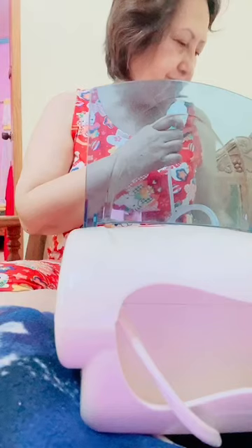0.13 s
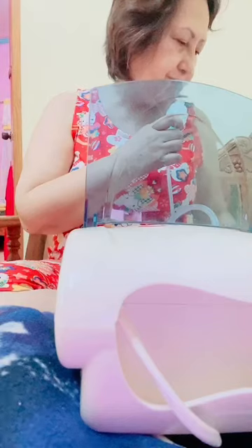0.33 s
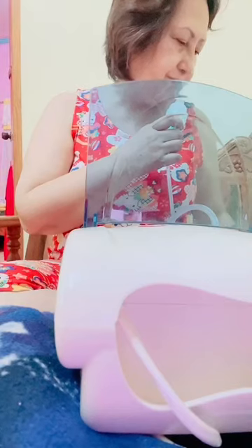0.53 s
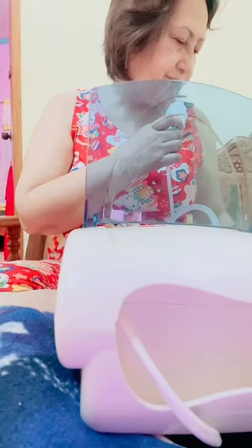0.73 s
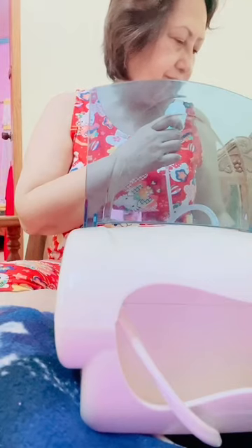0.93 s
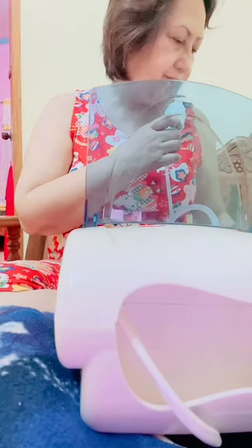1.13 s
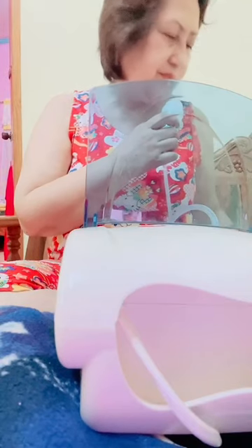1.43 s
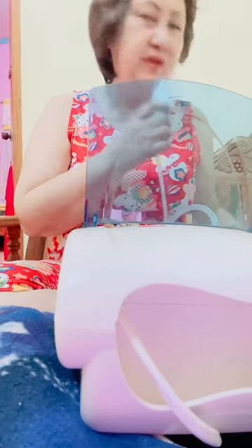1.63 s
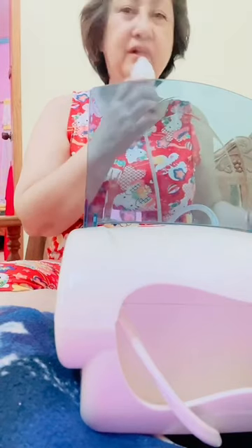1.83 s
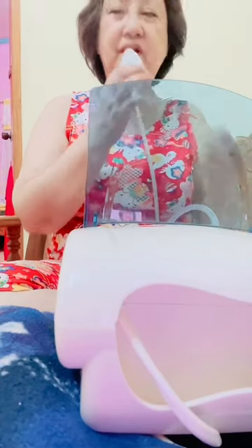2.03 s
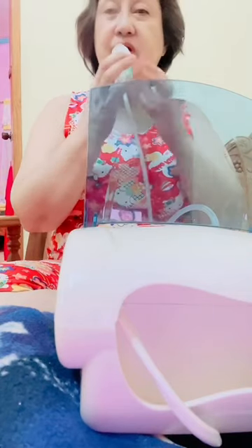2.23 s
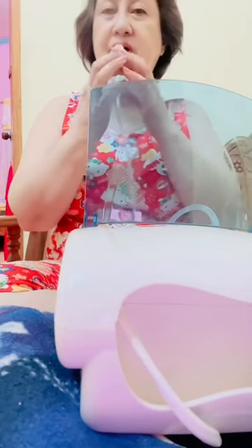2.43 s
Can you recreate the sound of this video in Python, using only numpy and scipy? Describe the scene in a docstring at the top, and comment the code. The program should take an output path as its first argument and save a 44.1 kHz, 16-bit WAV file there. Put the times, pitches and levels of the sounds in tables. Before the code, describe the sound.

A nebulizer compressor is already running close to the microphone in a bedroom, humming and buzzing with a throbbing plastic rattle. Its valve ticks rapidly, now and then snapping harder. Air hisses at the mouthpiece and droplets fizz finely in the cup. At about 1.5 seconds the fizz dies away, while the buzz and a slightly wavering hiss continue to the end at about 2.6 seconds.

```python
"""A bedroom, one microphone close to a nebulizer whose small piston compressor is already running.
The mains-driven motor hums; each shaft turn knocks the plastic housing several times and ticks a valve.
The knocks swell wherever they fall in step with the mains vibration, so the buzz throbs. Air hisses at
the mouthpiece, droplets fizz in the cup, and now and then the valve snaps harder.
About 1.5 s in, the cup is lifted and its fizz dies away; the machine and the hiss carry on."""
import sys
import numpy as np
from scipy import signal
from scipy.fft import rfft, irfft
from scipy.io import wavfile
from scipy.ndimage import uniform_filter1d

SR = 44100
rng = np.random.default_rng(int(sys.argv[2]) if len(sys.argv) > 2 else 0)


def store_pcm(level_fs):
    """Save levels as 16-bit WAV."""
    pcm = np.round(np.clip(level_fs, -1, 1) * 32767).astype(np.int16)
    wavfile.write(sys.argv[1], SR, np.atleast_2d(pcm).T)


N = 114219

SHAFT_HZ, HUM_HZ = 53.06, 119.93
JITTER_S, MAINS_PULL_S = .00012, .0007  # timing of knocks and ticks

# Shaft tones. Each entry: level in dB at 1, 2, 3, .. times the shaft rate.
SHAFT_TONES_DB = [-46.5, -38, -52, -41, -45.5, -50, -54.5, -48, -42, -44.5, -43]
# Mains hum and sidebands. Each entry: level in dB at the hum plus 0, 1, 2 shaft rates.
HUM_TONES_DB = [-31, -47, -41]
# Other steady tones. Each row: frequency in Hz, level in dB.
DRONE_TONES = [(48.7, -58), (72.9, -46), (292.9, -42.5)]

# Housing knocks and valve ticks within one turn.
# Each row: shaft angle in turns, relative level in dB, hum phase of the hardest hit in cycles.
TURN_KNOCKS = [(.03, -6.5, 0.396), (.2, -5, .2), (.31, -3.5, 0.614), (.4, -4.5, 0.84), (.58, 0.5, 0.096),
               (.7, -9.5, 0.538), (.92, -4.5, 0.844)]
TURN_TICKS = [(.5, 0, .8), (.84, 11, 0.93), (.99, -6, 0.058)]
# Hard valve snaps. Each row: start in seconds, relative level in dB.
HARD_SNAPS = [(0.164, -14), (0.2977, -26), (0.3736, -15), (0.5063, -14.5), (0.5995, -15), (0.7306, -13),
              (1.0908, -17.5), (1.3896, -19), (1.505, -19.5), (1.5992, -15), (1.7494, -14.5), (2.032, -20),
              (2.257, -16), (2.398, -17), (2.473, -17.5)]
# Loudness of the mouthpiece hiss and the cup's fizz. Each row: time in seconds, level in dB.
HISS_LEVELS = [(.04, -25), (.26, -26.5), (.33, -24), (.42, -26.5), (.8, -26.5), (1.15, -26.5),
               (1.39, -26.5), (1.48, -29.5), (1.67, -33), (1.72, -24.5), (1.77, -26.5), (1.81, -28.5),
               (2.06, -30), (2.1, -25.5), (2.15, -24), (2.22, -30.5), (2.58, -31)]
FIZZ_LEVELS = [(.04, -26), (.26, -24.5), (.36, -32), (.65, -29.5), (1.0, -25), (1.38, -26.5), (1.46, -27),
               (1.6, -40), (2.58, -60)]

# Colour of each sound at the microphone. Each row: frequency in Hz, relative gain in dB.
THUD_COLOUR = [(90, -24.5), (150, -3.5), (270, -1), (340, -7), (550, -0.5), (720, -8), (820, 1),
               (1000, -1.5), (1550, -7.5), (1820, -3.5), (2200, -6), (2650, -6), (3000, -35), (6500, -40)]
RATTLE_COLOUR = [(90, -31.5), (200, -9.5), (340, -6), (520, -3), (720, -3.5), (780, -2), (900, -0.5),
                 (970, -5.5), (1120, 0), (1350, -3.5), (1590, -7.5), (1780, -1.5), (2000, -4), (2380, -11),
                 (2660, -3.5), (2880, -15.5), (3450, -13), (3900, -17), (4200, -9), (4700, -35.5),
                 (6500, -59), (10000, -64)]
TICK_COLOUR = [(2240, -35), (3800, 14.5), (4380, -4.5), (4850, 13), (5490, 20.5), (5800, -32), (6400, 10.5),
               (7300, -10), (8120, -13), (9540, -9.5), (10700, -26), (13200, -12), (14300, -14),
               (15700, -7)]
AIR_COLOUR = [(2500, -37), (4100, -12), (4600, 1.5), (5000, 5.5), (5600, 3), (6300, -1.5), (6700, -12.5),
              (7100, -15.5), (7800, -50), (9000, -22), (9600, -15.5), (10500, -56), (13400, -13),
              (14250, -24), (15700, -30)]
SIZZLE_COLOUR = [(8000, -47), (12000, -6), (13600, -21), (14250, 10), (14900, -5), (15700, -13)]
HARD_SNAP_COLOUR = [(2500, -22), (4200, -15), (4750, 1), (5550, 3), (5950, -9), (6600, -17), (7600, -35),
                    (9500, -26), (11000, -45), (14200, -30), (15700, -45)]
ROOM_COLOUR = [(25, -16), (40, -5), (63, 4), (85, -3), (200, 1.5), (600, -8.5), (3000, -35)]

# Resonances of the case, the valve and the upright cup.
# Each row: frequency in Hz, width in Hz, relative gain in dB.
CASE_RESONANCES = [(822, 55, 0), (1815, 45, -1.5), (2650, 70, -12), (3680, 70, -8.5)]
VALVE_RESONANCES = [(4900, 54, -2), (5470, 47, 0)]
CUP_RESONANCES = [(4678, 78, 8), (4660, 160, -5), (4970, 130, -5), (5240, 120, -7)]


def undb(db):
    return 10 ** (np.asarray(db) / 20)


def level(x, db):
    """Scales x to an RMS level in dB, steady or a curve."""
    return x * undb(db) / np.sqrt(np.mean(x ** 2))


def noise():
    return rng.standard_normal(N)


def colour(x, points, size=4096):
    """Causal filter through (Hz, dB) points: its peaks ring after a blow."""
    hz, db = np.array(points).T
    bins_hz = np.maximum(np.fft.rfftfreq(size, 1 / SR), 1)
    gain = undb(np.interp(np.log(bins_hz), np.log(hz), db))
    cepstrum = irfft(np.log(gain))
    cepstrum[1:size // 2] *= 2  # fold to minimum phase
    cepstrum[size // 2 + 1:] = 0
    response = irfft(np.exp(rfft(cepstrum)))
    return signal.fftconvolve(x, response)[:N]


def ring(x, modes):
    """Sum of narrow resonances driven by x."""
    return sum(undb(db) * signal.lfilter(*signal.iirpeak(hz, hz / width, fs=SR), x)
               for hz, width, db in modes)


def pulses(times, sizes):
    """One impulse at each time."""
    at = np.round(times * SR).astype(int)
    inside = (at >= 0) & (at < N)
    return np.bincount(at[inside], sizes[inside], N)


def fade(x, decay_s):
    """Gives each impulse an exponential tail; run again with a shorter decay, it softens the rise."""
    return signal.lfilter([1], [1, -np.exp(-1 / (decay_s * SR))], x)


def blows(table, swing_db, scatter_db):
    """Blows at set shaft angles, pulled early or late by the mains vibration, harder when in step."""
    turns = np.arange(int(N / SR * SHAFT_HZ) + 1)
    hits = np.zeros(N)
    for angle, db, hardest_phase in table:
        lateness, strength = rng.standard_normal((len(turns), 2)).T
        times = (turns + angle) / SHAFT_HZ
        hum_phase = 2 * np.pi * (HUM_HZ * times - hardest_phase)
        times = times + JITTER_S * lateness - MAINS_PULL_S * np.sin(hum_phase)
        hits += pulses(times, undb(db + swing_db * np.cos(hum_phase) + scatter_db * strength))
    return hits


def motor(t):
    """The motor's clean tones: shaft multiples and the mains hum with its sidebands, plus a few other steady
    tones, the two lowest from a fan nearby."""
    tones = [((k + 1) * SHAFT_HZ, db) for k, db in enumerate(SHAFT_TONES_DB)]
    tones += [(HUM_HZ + k * SHAFT_HZ, db) for k, db in enumerate(HUM_TONES_DB)]
    return sum(np.sqrt(2) * undb(db) * np.sin(2 * np.pi * (hz * t + rng.random()))
               for hz, db in tones + DRONE_TONES)


def housing_knocks():
    """Each knock thuds on the plastic case and swells into a brief rattle; both set the case ringing."""
    hits = blows(TURN_KNOCKS, swing_db=2.5, scatter_db=.5)
    thud = level(colour(-hits, THUD_COLOUR), db=-30)
    tails = fade(hits, decay_s=.0024)
    rattle = fade(tails, .001) * noise()
    ringing = ring(level(hits, db=0) + level(rattle, db=0), CASE_RESONANCES)
    return thud + level(colour(rattle, RATTLE_COLOUR), db=-24.5) + level(ringing, db=-32)


def valve_ticks():
    """The valve ticks brightly on every turn and rings for a moment."""
    hits = blows(TURN_TICKS, swing_db=10, scatter_db=1.5)
    envelope = fade(hits, decay_s=.0033)
    ringing = ring(envelope * noise(), VALVE_RESONANCES)
    ticks = colour(envelope * noise(), TICK_COLOUR)
    return level(ticks, db=-34.5) + level(ringing, db=-38.5)


def air_hiss(t, sputter_hz=230, sputter_db=.5):
    """Air hisses at the mouthpiece under the nozzle's steady high sizzle; both sputter finely."""
    flutter = uniform_filter1d(noise(), int(SR / sputter_hz))
    sputter = undb(sputter_db * level(flutter, db=0))
    hiss = colour(noise() * sputter, AIR_COLOUR)
    hiss_db = np.interp(t, *np.array(HISS_LEVELS).T)
    sizzle = colour(noise() * sputter, SIZZLE_COLOUR)
    return level(hiss, hiss_db) + level(sizzle, db=-46)


def droplets(per_s=500, scatter_db=1.5):
    """Tiny bursts at random moments, of uneven strength."""
    return (rng.random(N) < per_s / SR) * undb(scatter_db * noise())


def cup_fizz(t):
    """Droplets ring the cup's resonances, a fizz that dies away when the cup is lifted."""
    ringing = sum(ring(droplets(), [mode]) for mode in CUP_RESONANCES)
    fizz_db = np.interp(t, *np.array(FIZZ_LEVELS).T)
    return level(colour(ringing, AIR_COLOUR), fizz_db)


def valve_snaps():
    """Now and then the valve snaps harder: a sharp, bright burst of noise."""
    times, db = np.array(HARD_SNAPS).T
    tails = fade(pulses(times, undb(db)), decay_s=.0056)
    bursts = fade(tails, .00032) * noise()
    return level(colour(bursts, HARD_SNAP_COLOUR), db=-33)


def bedroom_echo(x, t60_s=.083, db=-12):
    """The room's short echo, well below the direct sound at this distance."""
    tail = noise() * np.exp(-np.log(1000) * np.arange(N) / SR / t60_s)
    return undb(db) * signal.fftconvolve(x, tail / np.linalg.norm(tail))[:N]


def scene():
    """The machine close up in mono, with the echo of its buzz and a low room tone behind it."""
    t = np.arange(N) / SR
    hum = motor(t)
    buzz = housing_knocks() + valve_ticks() + air_hiss(t) + cup_fizz(t) + valve_snaps()
    room_tone = level(colour(noise(), ROOM_COLOUR), db=-42.5)
    return (hum + buzz + bedroom_echo(buzz) + room_tone)[None]


def record(dry, start_s=.036, top_hz=15700):
    """Everything begins abruptly a moment after the start; the highest treble is cut off."""
    on = np.arange(N) / SR >= start_s
    lowpass = signal.ellip(10, .2, 80, top_hz, fs=SR, output="sos")
    return signal.sosfilt(lowpass, dry * on)


dry = scene()
out = record(dry)
store_pcm(out)
```